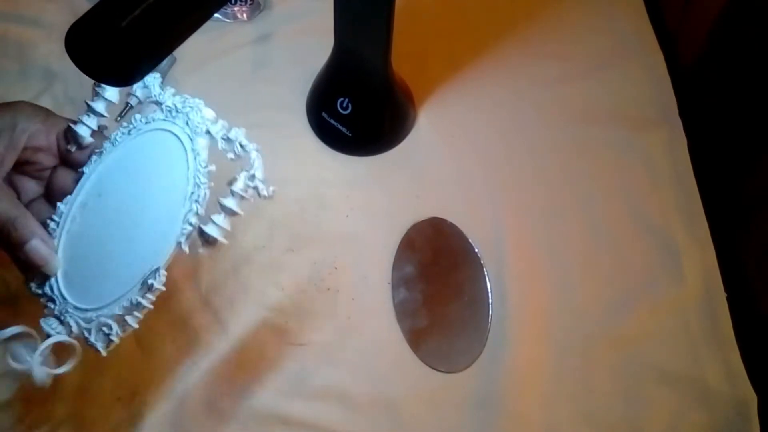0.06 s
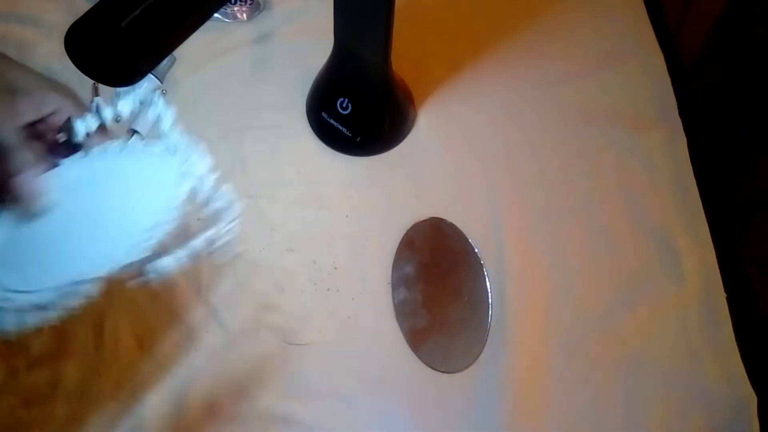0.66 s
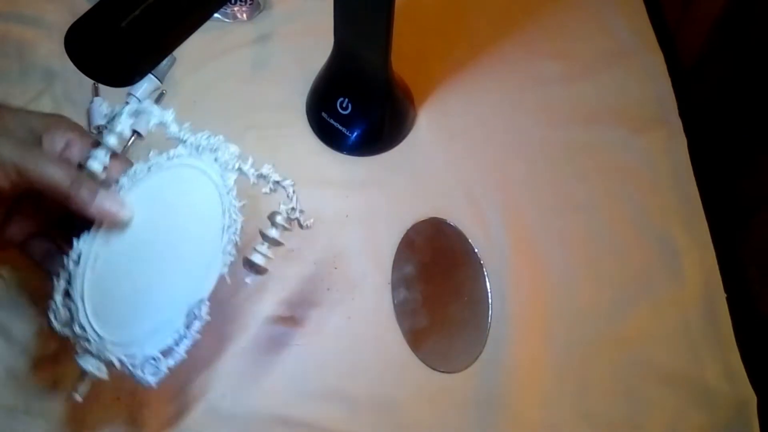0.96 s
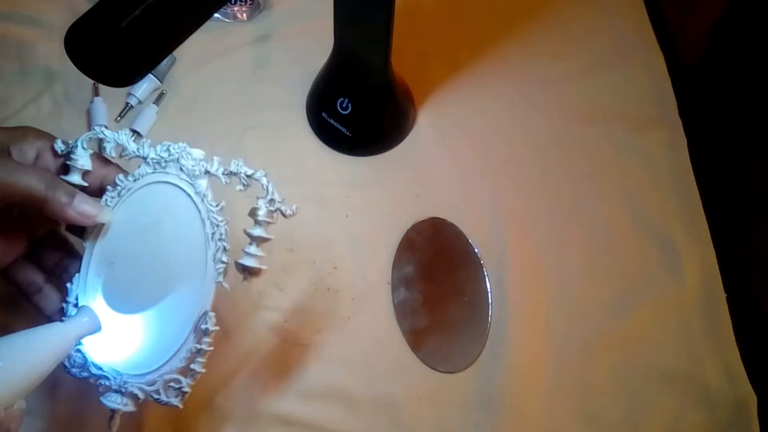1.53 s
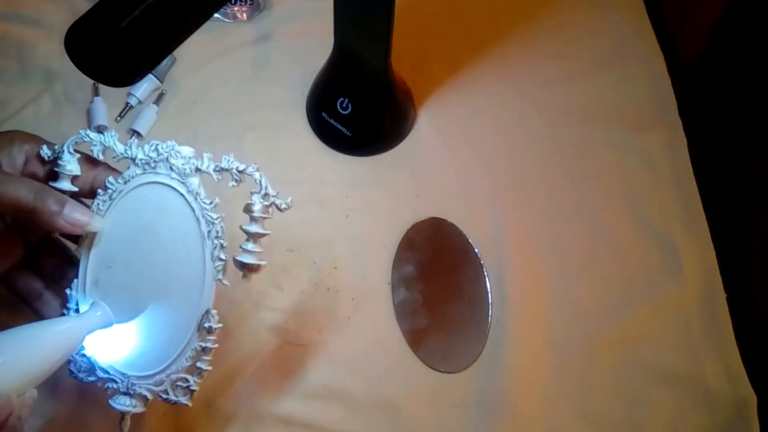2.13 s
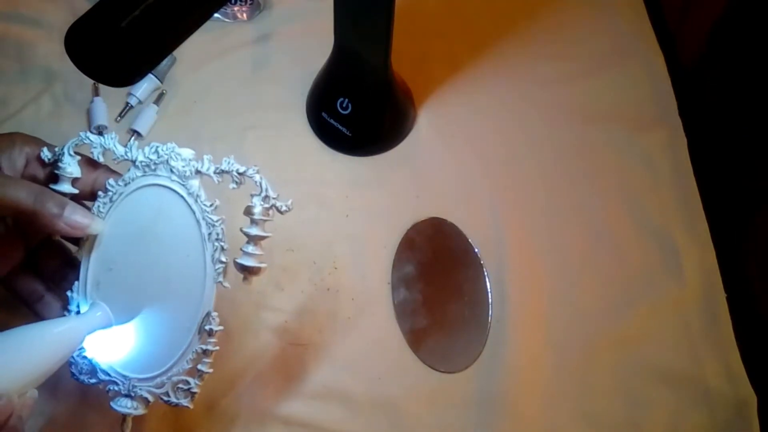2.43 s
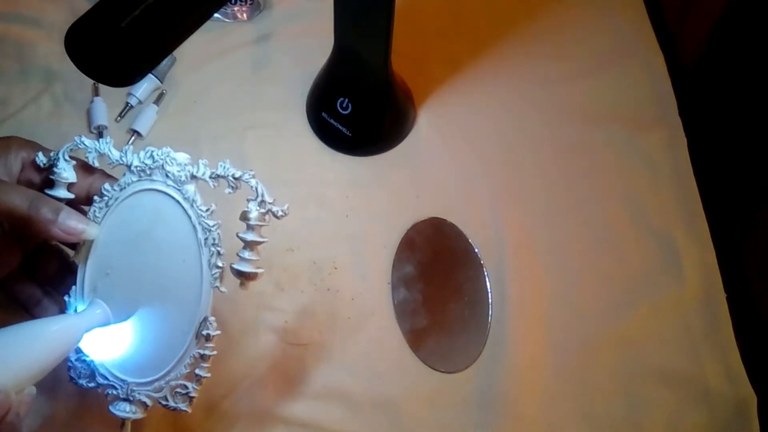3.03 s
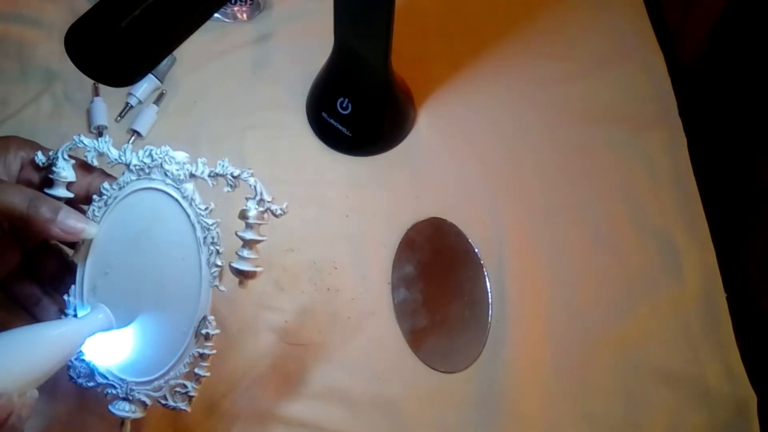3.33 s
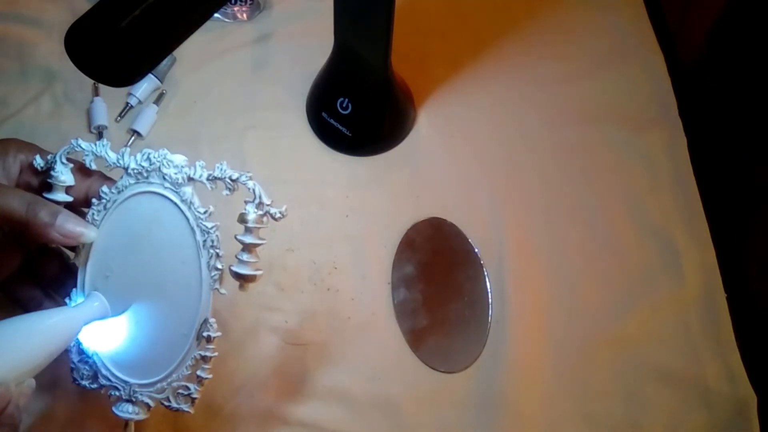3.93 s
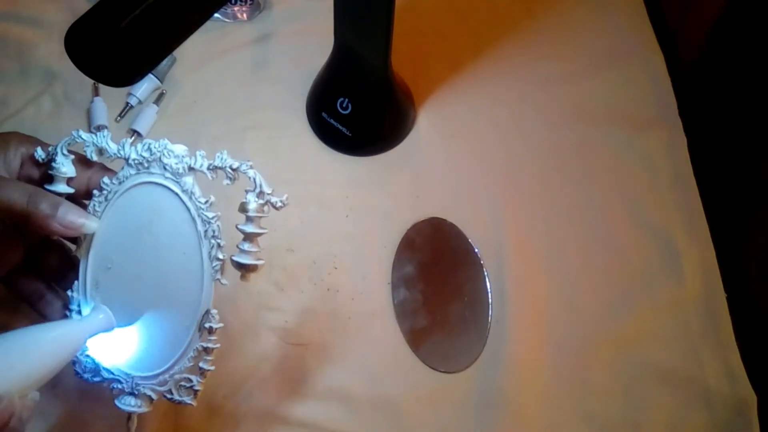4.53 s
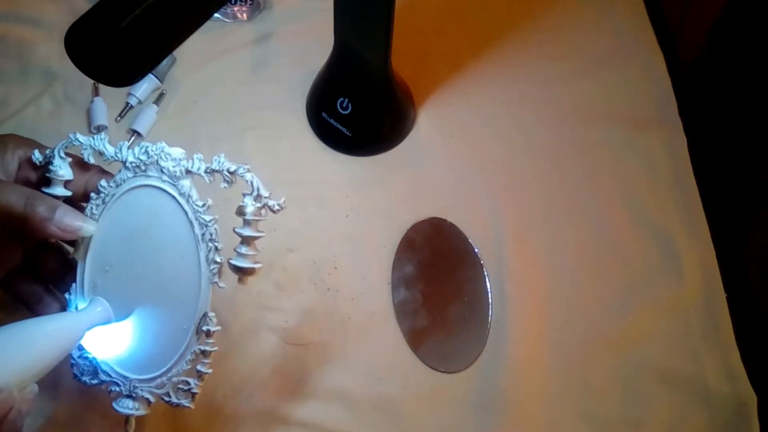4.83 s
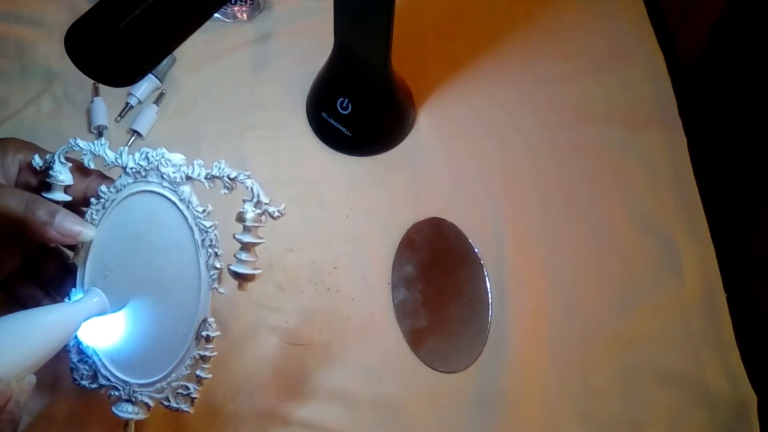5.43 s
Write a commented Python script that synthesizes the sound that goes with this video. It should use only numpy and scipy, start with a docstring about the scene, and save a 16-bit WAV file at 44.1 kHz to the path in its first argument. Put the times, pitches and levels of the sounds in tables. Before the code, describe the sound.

A small handheld electric file runs throughout, close by, with a high whine, a fine gear rattle and a thin hiss. At about 0.1 seconds a plastic frame knocks lightly as it is picked up, with two fainter taps and a soft finger rub. The tool idles, its tone shifting slightly. From 2.7 seconds the bit grinds dried glue off the frame, louder than the idle, with three short, light, pulsing scrapes. From 3.8 to 4.5 seconds a hard press drags the pitch down, the gears sing, the scrape growls and tiny chips crack off. The pitch recovers during a lighter scrape from 4.8 seconds. A second hard press starts around 5.2 seconds, sinking again, with a few more cracks near 5.5 seconds. The table and near walls add a short tail, over a faint low room hum.

```python
"""Electric nail file on a plastic frame

A small electric file idles with a whine and a gear rattle while a plastic frame is picked up, then grinds dried
glue off it in six presses. An 11-tooth pinion drives the 37-tooth wheel on the bit's shaft. The off-centre bit
bites once a turn; pressed hard it stays in contact, growls, its proud grain strikes hard at times, and it drags
the motor down while the loaded gears sing. Table and walls add a short tail, and the room hums."""
import sys
import numpy as np
from scipy import signal
from scipy.fft import rfft, irfft, next_fast_len
from scipy.io import wavfile
from scipy.ndimage import uniform_filter1d, map_coordinates

SR = 44100
rng = np.random.default_rng(int(sys.argv[2]) if len(sys.argv) > 2 else 0)


def bounce(signal):
    """Save signal as a 16-bit WAV file at the path given by the first command-line argument."""
    frames = np.transpose(np.atleast_2d(signal))
    limited = np.clip(frames, -1, 1)
    pcm = np.round(limited * 32767).astype(np.int16)
    wavfile.write(sys.argv[1], SR, pcm)


N = 245637

PINION_TEETH, WHEEL_TEETH = 11, 37
INERTIA_S = .098  # time constant with which the rotor's speed follows the drag
# the bit leans on the glue: (start [s], rise [s], hold [s], release [s], drag [share of free speed],
# scrape level [dB])
BIT_PRESSES = [(2.698, .158, .103, .18, .103, -35), (3.097, .185, .005, .107, .14, -34.3),
               (3.535, .075, .025, .045, .084, -41), (3.767, .305, .383, .066, .322, -34.3),
               (4.756, .242, .189, .042, .067, -38.5), (5.15, .255, .2, .1, .305, -34.8)]
# colour of one grain's strike: (frequency [Hz], level [dB])
STRIKE_COLOUR = [(300, -12), (1000, -12), (2500, -3), (3900, 10), (4900, 11), (6500, -3), (8000, -20),
                 (15500, -42)]
# resonances of frame and bit under the scrape: (frequency [Hz], width [Hz], gain [dB])
SCRAPE_MODES = [(2750, 120, -11), (3100, 45, 6), (3673, 120, 6), (4010, 190, 2), (4740, 180, 0.5),
                (5980, 97, 3), (6550, 45, 12), (7320, 126, 15)]


def grinding(teeth, mesh_hz, load, drag, scraping):
    """Each bite scrapes grit over the glue and loads the gear teeth, which then sing."""
    # colour of a light scrape: (frequency [Hz], level [dB])
    light_colour = [(200, -14.5), (650, -9), (1000, -0.5), (1600, -1), (2300, 6.5), (3350, -2.5), (3800, 3),
                    (5600, 1), (6800, 2.5), (8000, -12.5), (9000, -17), (10300, -21), (11600, -6.5),
                    (13000, -29), (14000, -13), (15500, -38)]
    # darker colour as pressure brings in the whole frame: (frequency [Hz], level [dB])
    heavy_colour = [(150, -31), (490, -16), (708, -28), (912, 0), (1370, 2.5), (1660, 3.5), (2180, 11.5),
                    (2650, -3), (4750, 3), (5330, 1.5), (6730, -1.5), (9360, -33), (11800, -11.5),
                    (15500, -32)]
    # hard spots turn a light scrape shrill:
    # (time [s], half-length [s], frequency [Hz], half-width [Hz], lift [dB])
    hard_spots = [(2.72, .025, 11600, 700, 20), (3.826, .03, 11500, 670, 9), (3.95, 0.023, 6550, 300, 7),
                  (4.856, .1, 11700, 700, 9), (5.03, 0.3, 6550, 340, 2)]
    force = bite(teeth, load, rise=.22, lag=.13) * amp(.4 * wobble(70))
    cut = bite(teeth, load, rise=.13, lag=.15) ** 1.2
    fine_grit = cut * ticks(rate=12000, scatter_db=-1)
    light = flaring(frame_resonance(ring(fine_grit, light_colour)), hard_spots)
    coarse_grit = cut * ticks(rate=5600, scatter_db=1) * amp(2.9 * tone(2 * teeth / WHEEL_TEETH))
    heavy = frame_resonance(ring(coarse_grit, heavy_colour))
    scrape = scraping * (amp(-.43) * np.sqrt(1 - load) * light + amp(-.9) * np.sqrt(load) * heavy)
    return scrape + gear_whine(teeth, mesh_hz, load, drag, scraping, force)


def pressing(wear_db_per_s=6, half_scrape_drag=.087):
    """The presses as motor drag and scrape strength; the scrape fades as the glue wears smooth."""
    t, drag, weighted = np.arange(N) / SR, np.zeros(N), np.zeros(N)
    for start, rise, hold, release, share, db in BIT_PRESSES:
        shape = np.interp(t, start + np.cumsum([0, rise, hold, release]), [0, 1, 1, 0])
        wear_db = wear_db_per_s * np.maximum(t - start - rise, 0)
        drag += share * shape
        weighted += amp(db + .56 - wear_db) * share * shape ** 1.124
    return drag, weighted / (drag + half_scrape_drag)


def bite(teeth, load, rise, lag, light_db=25, hard_db=1.5):
    """The bit's high side digs in once a turn and lifts off, less under load; rise and lag in turns."""
    bounce_db = hard_db + (light_db - hard_db) * (1 - load) ** 2
    turn = (teeth / WHEEL_TEETH - lag) % 1
    contact = amp(bounce_db * np.interp(turn, [0, rise, rise + .14, .75, 1], [-1, 0, -.12, -.85, -1]))
    return contact / np.sqrt(uniform_filter1d(contact ** 2, SR // 20))


def frame_resonance(x, drift=.014):
    """The frame's resonances colour x, and drift as the bit wanders over it."""
    place = np.clip(.5 + .45 * wobble(9), 0, 1)
    low, high = (resonant(x, [(hz * (1 + side * drift), width, db) for hz, width, db in SCRAPE_MODES])
                 for side in (-1, 1))
    return unit((1 - place) * low + place * high)


def gear_whine(teeth, mesh_hz, load, drag, scraping, force):
    """Loaded teeth sing at multiples of the mesh rate, with extra overtones near stalling."""
    # overtones of the loaded gears: (multiple of the mesh rate, level [dB])
    whine_partials = [(1, -0.5), (3, -8.5), (4, -9)]
    # overtones near stalling: (multiple of the mesh rate, level [dB])
    strain_partials = [(2, -12), (3, -19), (4, -13), (5, -16)]
    # what the housing lets out: (frequency [Hz], gain [dB])
    housing = [(1500, -12.5), (2200, -0.5), (5000, -9.5), (6700, -1.5), (8000, -16), (9200, -18),
               (10300, -10), (12000, -43)]
    slip = .028 * wobble(420) + .036 * wobble(90)  # the teeth never meet quite on time
    overtone = lambda k: amp(along(housing, k * mesh_hz)) * tone(k * (teeth + slip))
    pinion_swing = 1 + .1 * tone(teeth / PINION_TEETH)  # the pinion runs off centre
    tooth_load = force ** 1.25 * amp(1.1 * wobble(200)) * pinion_swing
    whine = whine_strength(drag, mesh_hz) * sum(amp(db) * overtone(k) for k, db in whine_partials)
    strain = sum(amp(db + 3.8 * wobble(200)) * overtone(k) for k, db in strain_partials)
    return tooth_load * (whine + scraping * np.sqrt(load) * strain)


def whine_strength(drag, mesh_hz, peak_hz=2215, half_width_hz=310, friction=.029):
    """From the first touch on, the whine follows drag plus gear friction and peaks near one mesh rate."""
    touched = np.arange(N) / SR > BIT_PRESSES[0][0]
    tooth_force = lagging(touched * (drag + friction), seconds=.018)
    return amp(-22.9) * tooth_force / (1 + ((mesh_hz - peak_hz) / half_width_hz) ** 2)


def chatter(teeth, load, scraping, size=1024):
    """Pressed hard, the same grit passes at every turn: a pitched growl, and one proud grain strikes."""
    # the frame's answer to the turning grit: (frequency [Hz], level [dB])
    growl_colour = [(60, -24), (150, -15), (240, -2.5), (370, 0.5), (520, -1.5), (700, -4), (950, 4),
                    (1300, -3), (2000, 1), (3000, 9.5), (6000, -52)]
    # drone of the bit's strongest bumps: (multiple of the bit's turn rate, level [dB])
    bumps = [(6, -34), (9, -35), (11, -29.5), (13, -32), (26, -27), (29, -28)]
    turn = teeth / WHEEL_TEETH
    rim = irfft(np.exp(2j * np.pi * rng.random(size // 2 + 1)))  # equally rough at every scale
    stray = .013 * wobble(70)  # the grit shifts a little at each pass
    grit = np.interp((turn + stray) % 1, np.arange(size) / size, rim)
    growl = amp(-12 + 2.9 * wobble(25.01)) * ring(grit, growl_colour)
    growl += sum(amp(db + 2 * wobble(14)) * tone(k * turn + .08 * wobble(60)) for k, db in bumps)
    snag = amp(-130 * ((turn - .3) % 1) + 1.9 * wobble(45))
    strikes = amp(-6.5) * resonant(ring(snag * rng.standard_normal(N), STRIKE_COLOUR), SCRAPE_MODES)
    return scraping * ((load + .044) * growl + load * strikes)  # even a light touch growls a little


def handpiece(teeth, drag):
    """The idling tool: drag takes up the backlash, so whirr and rattle recede while the hiss stays."""
    # the hand brings the tool to the work: (time [s], level [dB])
    presence = [(0, -2.5), (.21, -3), (.28, -0.6), (.85, -1.5), (1.5, 0.5), (2.7, 0)]
    presence_db = curve(presence)
    motor, bit = teeth / PINION_TEETH, teeth / WHEEL_TEETH
    taken_up = lagging(drag, seconds=.057)
    whirr = amp(-36 * taken_up) * shaft_whirr(motor, bit, presence_db)
    rattle = amp(-44.5 + presence_db - 21 * taken_up) * gear_rattle(motor, bit)
    return whirr + rattle + brush_hiss() + whistles()


def shaft_whirr(motor, bit, presence_db):
    """The motor and the wheel's uneven teeth sound harmonics of their shafts' turn rates."""
    # motor partials: (multiple of the motor's turn rate, level [dB])
    motor_partials = [(8, -68.5), (9, -60), (10, -60.5), (11, -57), (12, -63), (13, -66), (21, -76),
                      (22, -67), (23, -70), (33, -72), (44, -81)]
    # partials of the uneven teeth: (multiple of the bit's turn rate, level [dB])
    wheel_partials = [(34, -62), (36, -61), (38, -63), (39, -65), (40, -64)]
    # partials swell or sink as the tool turns in the hand:
    # (time [s], half-length [s], multiple of the motor's turn rate, lift [dB])
    swells = [(.33, .06, 10, 5), (.4, .3, 9, -6), (.58, .1, 22, 10), (.62, .08, 12, 5), (.95, .16, 9, 9),
              (.95, .15, 12, -12), (1.05, .25, 11, 6.5), (1.1, .2, 21, 16), (1.2, .6, 8, 9),
              (1.25, .35, 22, 12), (1.3, .2, 13, 6), (1.6, .33, 9, 9), (1.63, .17, 11, -15),
              (1.85, .3, 12, 4), (2.3, .75, 10, 11), (2.35, .7, 33, 13)]
    lift_db = lambda order: sum(db * bell(s, half) for s, half, k, db in swells if k == order)
    flutter = .0022 * wobble(45)  # unsteady speed blurs the high partials most
    motor_tone = sum(amp(db + lift_db(k) + 1.3 * wobble(30)) * tone(k * (motor + flutter))
                     for k, db in motor_partials)
    wheel_tone = sum(amp(db + 1.6 * wobble(14)) * tone(k * bit + .038 * wobble(25))
                     for k, db in wheel_partials)
    return motor_tone + amp(4.4 * presence_db) * wheel_tone


def gear_rattle(motor, bit):
    """Backlash: a spray of tiny impacts that pulses in step with both shafts."""
    # colour of the rattle: (frequency [Hz], level [dB])
    colour = [(200, -23), (450, -26), (650, -21.5), (900, -5), (1450, -5.5), (1950, 3.5), (2500, 5.5),
              (3400, 0), (5000, 3), (6100, 3.5), (6800, 6), (8000, -15), (10500, -21), (15500, -27)]
    # narrow resonances of the handpiece: (frequency [Hz], width [Hz], gain [dB])
    modes = [(1733, 29, -19), (2630, 55, -23), (6370, 120, -14), (7120, 43, 4.5)]
    # bands flare as the tool is turned:
    # (time [s], half-length [s], frequency [Hz], half-width [Hz], lift [dB])
    flares = [(0.143, 0.17, 4770, 260, 7.5), (0.287, 0.028, 2430, 350, 7), (0.292, 0.038, 6200, 1100, 3.5),
              (.507, .012, 3840, 350, 13), (0.634, 0.14, 2700, 250, 5), (0.402, 0.64, 7600, 280, 9.5),
              (0.807, .13, 9500, 300, 15), (1, 0.43, 5000, 447, 1.5)]
    swing_db = .23 * tone(motor) + .47 * tone(2 * motor) + .25 * tone(bit) + .096 * tone(bit / 2)
    flicker_db = 1.6 * wobble(350)
    impacts = ticks(rate=9000, scatter_db=2) * amp(swing_db + flicker_db)
    return flaring(resonant(ring(impacts, colour), modes), flares)


def grain_strikes(t60=.0066):
    """Under hard pressure, the bit's proud grain at times strikes harder, with a short crack that rings the
    frame."""
    # harder strikes of the proud grain: (time [s], level [dB])
    hits = [(3.8537, -32), (3.9035, -31), (4.0271, -30), (4.0592, -29), (4.0795, -32), (4.1, -32),
            (4.121, -29), (4.1655, -30), (4.1742, -31), (4.1958, -31), (4.2785, -28), (4.3012, -31),
            (4.3246, -32), (5.4505, -31), (5.4928, -27.5), (5.5143, -28.5)]
    t = np.arange(N) / SR
    bursts = sum(amp(db + 1 - 60 * np.abs(t - s) / t60) * (t >= s) for s, db in hits)
    return bursts * resonant(ring(rng.standard_normal(N), STRIKE_COLOUR), SCRAPE_MODES)


def knocks():
    """The plastic frame knocks as it is picked up and rings briefly."""
    # knocks on the frame: (time [s], level [dB])
    taps = [(.094, -30.5), (.177, -41), (.201, -48)]
    # the frame's ring: (frequency [Hz], level [dB], t60 [s])
    modes = [(640, -13, .018), (860, -9, .02), (973, 0, .026), (1156, -2, .028), (1370, -7, .02),
             (4810, -7, .012), (6350, -2, .025)]
    out, t = np.zeros(N + SR), np.arange(SR // 5) / SR
    attack = 1 - np.exp(-t / .00035)
    for s, db in taps:
        ringing = sum(amp(level - 60 * t / t60) * np.sin(2 * np.pi * (hz * t + rng.random()))
                      for hz, level, t60 in modes)
        out[round(s * SR):][:len(t)] += amp(db - 3) * ringing * attack
    return out[:N]


def gear_shrill(teeth, mesh_hz, drag, housing_hz=8750, half_width_hz=600):
    """Under load, mesh harmonics four and five whistle as they pass a resonance of the housing."""
    held = lagging(drag, INERTIA_S)
    passing = lambda k: 1 / (1 + ((k * mesh_hz - housing_hz) / half_width_hz) ** 2)
    partial = lambda k: amp(-64 + 3 * wobble(120)) * tone(k * (teeth + .04 * wobble(280)))
    return held / (held + .035) * sum(passing(k) * partial(k) for k in (4, 5))


def brush_hiss():
    """The motor's brushes give a high hiss that beams as the tool is turned."""
    # swell of the hiss: (time [s], level [dB])
    levels = [(.2, -62.5), (.3, -57.5), (.62, -59.5), (.9, -70), (1.55, -61.5), (2.1, -60), (2.7, -57)]
    # colour of the hiss: (frequency [Hz], level [dB])
    colour = [(5000, -34), (7500, 8), (8600, 10), (9700, 0.5), (10800, -13.5), (12200, -7), (13200, -4),
              (14600, -20), (15800, 1.5)]
    return amp(curve(levels) + 1.5 * wobble(25)) * ring(rng.standard_normal(N), colour)


def whistles(start_s=1.1, settle_s=.4, width_hz=400):
    """Faint, narrow bands of hiss glide up as the tool is lowered to the work, then slowly fade."""
    # airy whistles: (final frequency [Hz], rise [Hz], level [dB])
    bands = [(9820, 790, -70), (12380, 700, -72.5), (14850, 1000, -76)]
    age = np.maximum(np.arange(N) / SR - start_s, 0)
    glide, out = np.exp(-age / settle_s), np.zeros(N)
    for hz, rise_hz, db in bands:
        cycles = np.cumsum(hz - rise_hz * glide) / SR
        out += amp(db) * unit(wobble(width_hz) * tone(cycles) + wobble(width_hz) * tone(cycles + 1 / 4))
    return out * (1 - np.exp(-age / .08)) * amp(-2.5 * age)


def rubs():
    """The frame slides softly in the fingers as it is turned over or pushed by the bit."""
    # finger rubs: (time [s], half-length [s], frequency [Hz], half-width [Hz], level [dB])
    slides = [(.09, .14, 1050, 450, -60), (.86, .04, 280, 160, -67), (3.26, .08, 420, 120, -62),
              (5.16, .04, 420, 150, -65)]
    return sum(amp(db) * bell(s, half) * unit(band(rng.standard_normal(N), hz, width))
               for s, half, hz, width, db in slides)


def walls(x, t60, wet_db):
    """The table and near walls add a short, dense tail."""
    t = np.arange(SR // 3) / SR
    tail = rng.standard_normal(len(t)) * amp(-60 * t / t60) * (t > .002)
    return x + amp(wet_db) * signal.fftconvolve(x, tail / np.linalg.norm(tail))[:N]


def room_tone():
    """A low rumble and a slightly unsteady hum; both dip, then swell as the work goes on."""
    # hum in the room: (frequency [Hz], level [dB])
    hum_partials = [(72, -75.5), (119.3, -68.5), (230, -74.5)]
    # colour of the rumble: (frequency [Hz], level [dB])
    colour = [(13, -61), (22, -18), (60, -4.5), (91, -3), (119, -1), (146, -9.5), (228, -6.5), (396, -17),
              (600, -29), (780, -24), (1320, -120)]
    t = np.arange(N) / SR
    hum = sum(amp(db + .091 * wobble(13)) * tone(hz * t + .2 * wobble(14)) for hz, db in hum_partials)
    rumble = amp(-67) * ring(rng.standard_normal(N), colour)
    swell_db = curve([(0, 1.5), (1, -2), (5.57, 6)])
    return amp(swell_db) * (hum + rumble)


def amp(db):
    """Decibels to gain."""
    return 10 ** (np.asarray(db) / 20)


def unit(x):
    """x at rms 1."""
    return x / np.sqrt(np.mean(x ** 2) + 1e-20)


def along(points, hz):
    """(frequency [Hz], value) points read on a log axis."""
    f, v = np.transpose(points)
    return np.interp(np.log(hz + 1), np.log(f + 1), v)


def curve(points):
    """(time [s], value) points joined by straight lines."""
    return np.interp(np.arange(N) / SR, *np.transpose(points))


def bell(centre_s, half_s):
    """A bell shape in time, top 1."""
    return np.exp(-((np.arange(N) / SR - centre_s) / half_s) ** 2)


def wobble(rate):
    """A smooth random curve, rate knots a second."""
    at = np.arange(0, N * rate / SR + 1, 1 / 4)
    knots = rng.standard_normal(int(at[-1]) + 4)
    return np.interp(np.arange(N) * rate / SR, at, map_coordinates(knots, [at]))


def lagging(x, seconds):
    """x followed with a time constant."""
    keep = np.exp(-1 / (seconds * SR))
    return signal.lfilter([1 - keep], [1, -keep], x)


def tone(cycles):
    """A sine of rms 1."""
    return np.sqrt(2) * np.sin((2 * np.pi * (cycles % 1)).astype(np.float32))


def ticks(rate, scatter_db):
    """Tiny impacts at random moments with scattered sizes."""
    chance, size = rng.random(N), rng.standard_normal(N)
    return unit((chance < rate / SR) * amp(scatter_db * size) * rng.choice([-1, 1], N))


def filtered(x, response):
    """x shaped by a frequency response."""
    size = next_fast_len(N + SR // 2)
    return irfft(rfft(x, size) * response(np.fft.rfftfreq(size, 1 / SR)), size)[..., :N]


def band(x, hz, half_width_hz):
    """A bell-shaped band of x."""
    return filtered(x, lambda f: np.exp(-((f - hz) / half_width_hz) ** 2))


def flaring(x, flares):
    """x with single bands lifted for a moment."""
    return x + sum((amp(db * bell(s, half)) - 1) * band(x, hz, width) for s, half, hz, width, db in flares)


def ring(x, colour, size=8192):
    """x through a minimum-phase body of the given colour, at rms 1."""
    cepstrum = irfft(np.log(amp(along(colour, np.fft.rfftfreq(size, 1 / SR)))))
    cepstrum[1:size // 2] *= 2
    cepstrum[size // 2 + 1:] = 0
    return unit(signal.oaconvolve(x, irfft(np.exp(rfft(cepstrum))))[:N])


def resonant(x, modes, size=4096):
    """x with narrow resonances added, at rms 1."""
    f = np.fft.rfftfreq(size, 1 / SR)
    peaks = sum(amp(db) * 1j * f * width / (hz * hz - f * f + 1j * f * width) for hz, width, db in modes)
    return unit(signal.oaconvolve(x, irfft(1 + peaks))[:N])


def scene():
    """The presses drive the tool: their drag slows the gears, and a slower bit scrapes more softly."""
    # gear speed with no drag: (time [s], mesh rate [Hz])
    free_speed = [(0, 2392), (.15, 2390), (.3, 2365), (.8, 2378), (1.35, 2380), (2.5, 2402)]
    # the bit catches on ridges of glue: (time [s], half-length [s], extra drag [share of free speed])
    catches = [(4.1, .035, .055), (4.312, .022, .11), (5.455, .025, .05)]
    # thick and thin glue passes under the bit: (time [s], half-length [s], scrape change [dB])
    patches = [(2.82, .05, -3), (2.9, .025, 2.5), (2.99, .025, 2), (3.21, .04, -3.5), (3.29, .025, 2),
               (3.84, .035, 1.5), (3.95, .03, 2), (5.15, .03, 2)]
    drag, contact = pressing()
    caught = sum(extra * bell(s, half) for s, half, extra in catches)
    speed = 1 - lagging(drag + caught, INERTIA_S)
    mesh_hz = curve(free_speed) * speed
    scraping = contact * speed ** 1.12 * amp(sum(db * bell(s, half) for s, half, db in patches))
    teeth = np.cumsum(mesh_hz) / SR  # running count of meshed teeth
    load = np.clip((2300 - mesh_hz) / 550, 0, 1)  # 0 running free, 1 pressed hard
    tool = handpiece(teeth, drag) + grinding(teeth, mesh_hz, load, drag, scraping)
    tool += chatter(teeth, load, scraping) + gear_shrill(teeth, mesh_hz, drag)
    near = tool + grain_strikes() + knocks() + rubs()
    return (walls(near, t60=.21, wet_db=-11.5) + room_tone())[None]


def record(dry):
    """A steep high cut at 15.8 kHz."""
    return filtered(dry, lambda hz: hz < 15800)


dry = scene()
out = record(dry)
bounce(out)
```